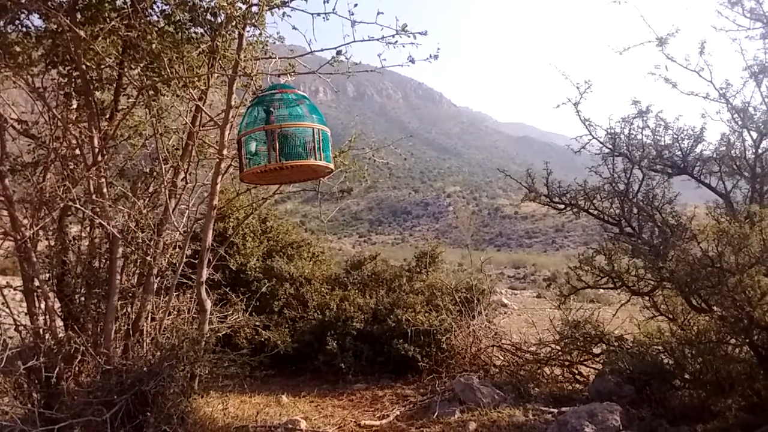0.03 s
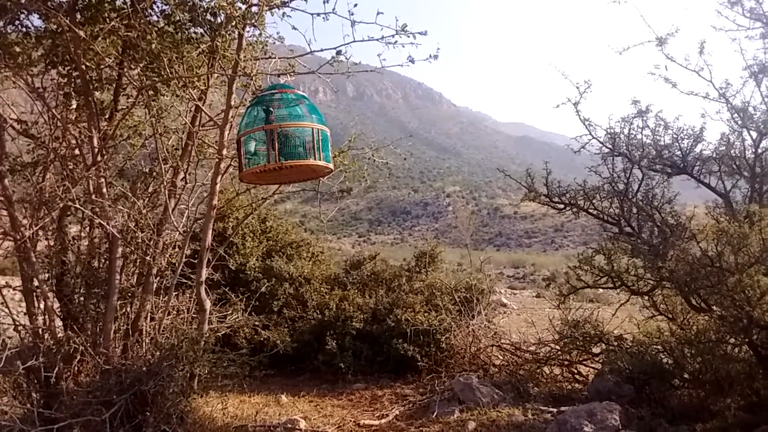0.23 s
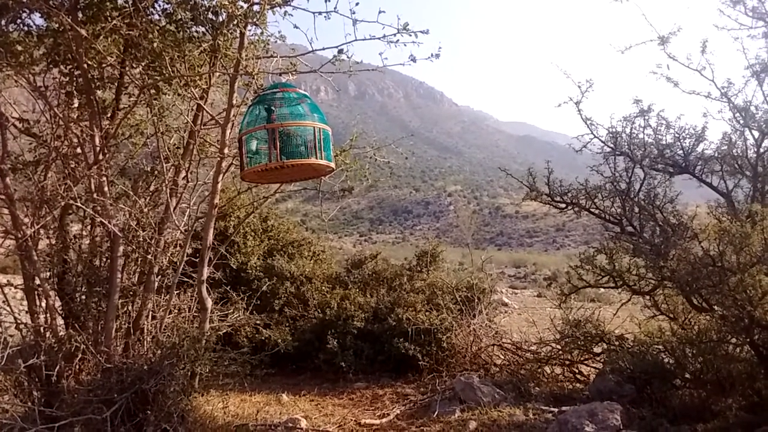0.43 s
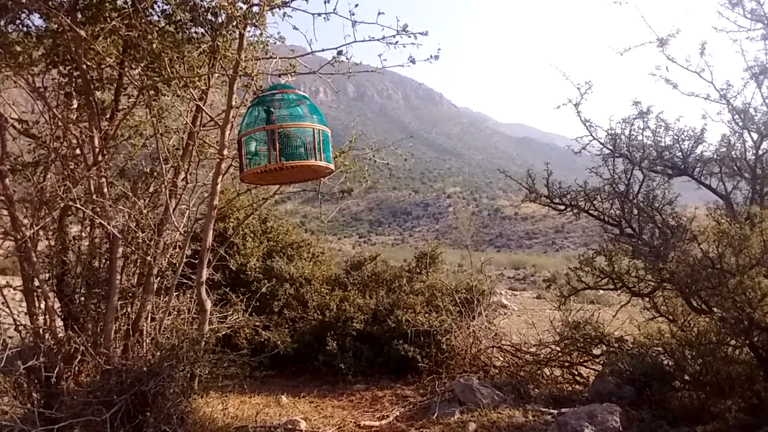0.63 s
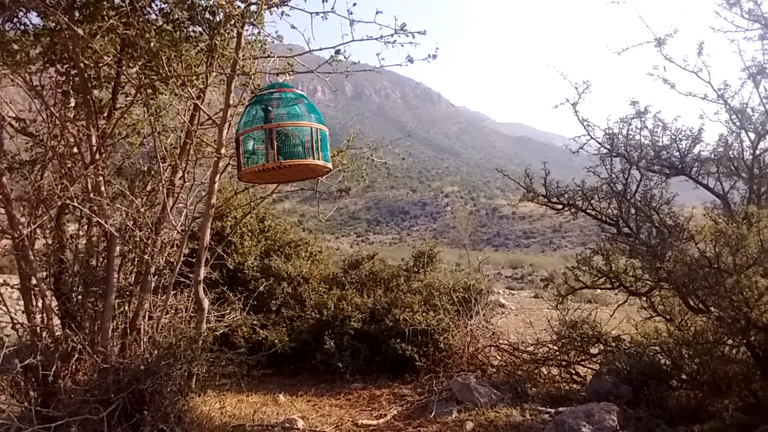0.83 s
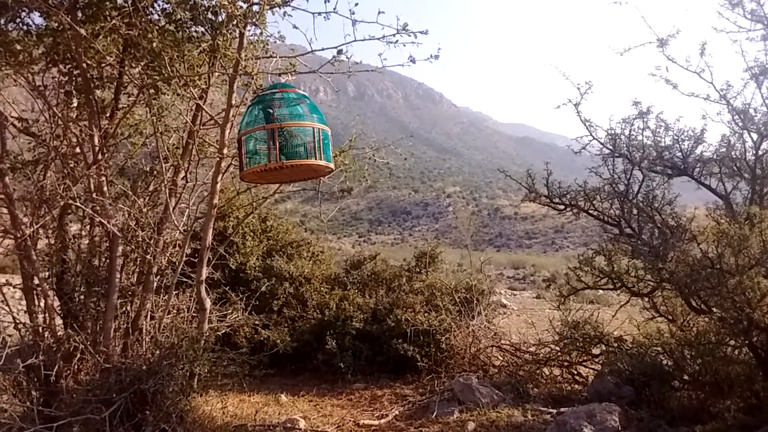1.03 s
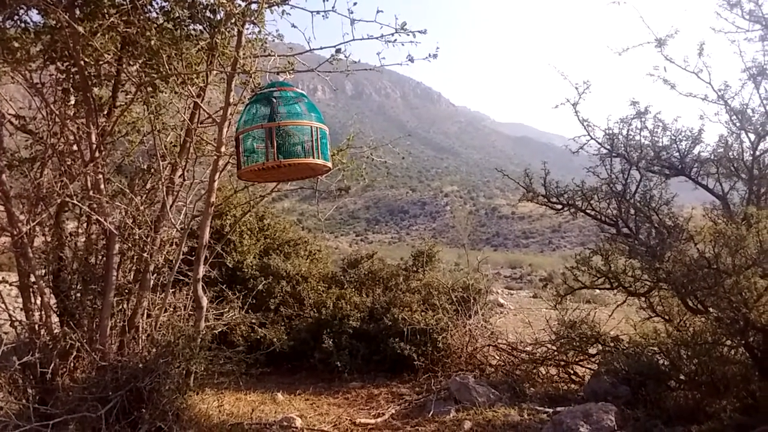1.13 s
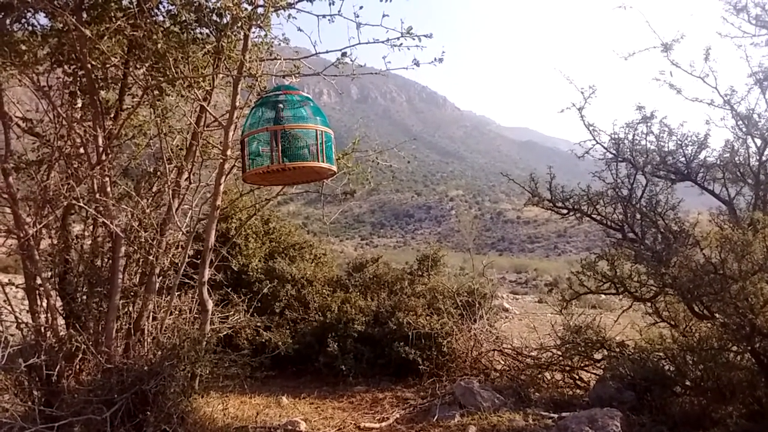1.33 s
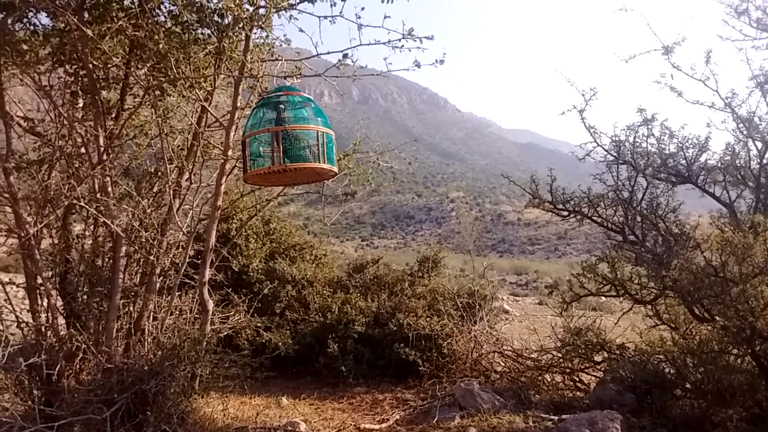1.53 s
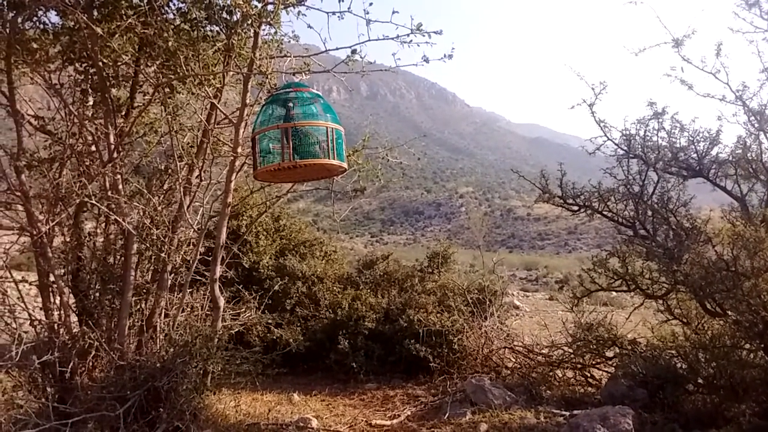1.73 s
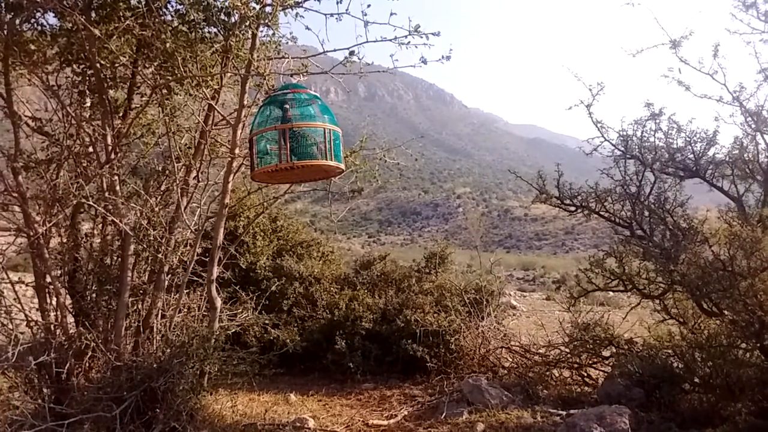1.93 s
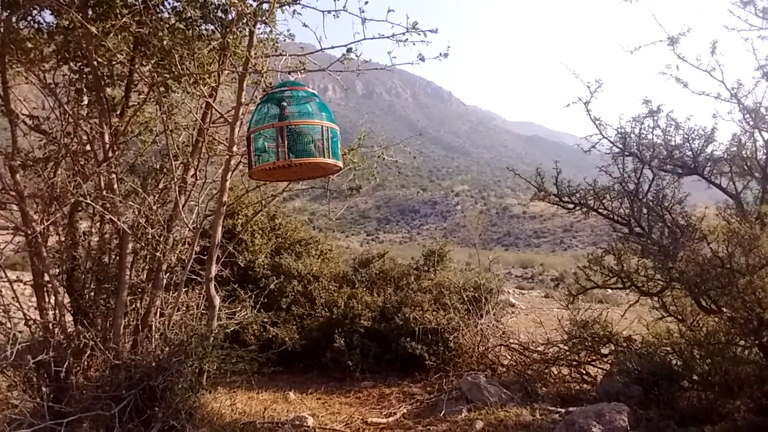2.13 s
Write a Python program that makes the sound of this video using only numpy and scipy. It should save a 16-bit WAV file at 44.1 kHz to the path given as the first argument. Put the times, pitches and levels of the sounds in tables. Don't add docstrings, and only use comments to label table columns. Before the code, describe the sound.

One quick francolin call, chip, whistle and falling yap, then a foot scuffs on gravel

```python
import sys
import numpy as np
from scipy import signal
from scipy.fft import rfft, irfft, next_fast_len
from scipy.io import wavfile
from scipy.ndimage import uniform_filter1d

SR = 44100
rng = np.random.default_rng(int(sys.argv[2]) if len(sys.argv) > 2 else 0)


def to_wav(s):
    ch = np.atleast_2d(s).T
    pcm = np.round(np.clip(ch, -1, 1) * 32767)
    wavfile.write(sys.argv[1], SR, pcm.astype(np.int16))


def voltage_ratio(level):
    return 10 ** (np.asarray(level, float) / 20)


N = 96711

# (frequency [Hz], density [dB per Hz])
BEAK_COLOUR = [(1500, -4), (3000, -3), (5600, 8), (7300, -7), (9300, -1), (10800, -8), (12300, -13),
               (15500, -14)]


def shaped(x, gain):
    size = next_fast_len(N + 4096)
    hz = np.arange(size // 2 + 1) * SR / size + 1e-3
    return irfft(rfft(x, size) * gain(hz), size)[..., :N]


def late(x, lag_s):
    return shaped(x, lambda f: np.exp(-2j * np.pi * f * lag_s))


def noise(colour, channels=1):
    hz, db = np.array(colour).T

    def gain(f):
        return voltage_ratio(np.interp(np.log(f), np.log(hz), db)) * np.minimum(f / hz[0], 1) ** 2

    x = shaped(rng.standard_normal((channels, N)), gain)
    return x / x.std()


def walk(rate_hz):
    k = max(int(SR / rate_hz), 2)
    x = uniform_filter1d(uniform_filter1d(rng.standard_normal(N), k), k)
    return x / x.std()


def air():
    # (frequency [Hz], density [dB per Hz])
    air_colour = [(28, -14), (60, -2.5), (130, 0), (300, -11), (900, -16.5), (2500, -19.5), (6200, -29),
                  (15000, -29)]
    air_db, shared_db, shared_hz = -54.5, 2, 294
    swell_s, swell_db = 1.39, 2
    motor_hz, motor_db = 325, -61.5
    t = np.arange(N) / SR
    shared = shaped(noise(air_colour), lambda f: voltage_ratio(shared_db) / (1 + 1j * f / shared_hz))
    swell = swell_db / (1 + np.exp(-(t - swell_s) / 0.018)) + 0.13 * walk(3.5)
    breeze = voltage_ratio(air_db + swell) * (noise(air_colour, channels=2) + shared)
    motor_phase = 2 * np.pi * np.cumsum(motor_hz * (1 + 0.00796 * walk(12.6))) / SR
    motor = np.sin(motor_phase) * voltage_ratio(motor_db + 1.35 * walk(16))
    return breeze + motor * np.array([[1], [.6]])


def far_birds():
    # (time [s], pitch [Hz], length [s], level [dB])
    blips = [
        (0.266, 1000, 0.0039, -49.5),
        (0.584, 1250, 0.0037, -53),
        (0.607, 2800, 0.0033, -51),
    ]
    t = np.arange(N) / SR
    return sum(voltage_ratio(db) * np.exp(-((t - s) / w) ** 2) * np.sin(2 * np.pi * hz * t)
               for s, hz, w, db in blips)


def note(curve, orders, jitter, shimmer_db, rasp_db, hiss_db, muffle_db=0):
    # (centre [Hz], width [Hz], boost [dB])
    throat = [(1917, 120, 5.5), (2710, 350, 5), (9680, 500, 20)]
    beak_opens_s = 0.0084
    t = np.arange(N) / SR
    s, hz, db = np.array(curve).T
    pitch = np.interp(t, s, hz) * (1 + jitter * walk(400))
    phase = 2 * np.pi * np.cumsum(pitch) / SR
    shut_db = muffle_db * np.exp(-(np.maximum(t - s[0], 0) / beak_opens_s) ** 2)
    tone = 0
    for k, order_db in orders:
        throat_db = sum(lift * np.exp(-((k * pitch - mid) / width) ** 2) for mid, width, lift in throat)
        level_db = order_db + throat_db - shut_db * max(k - 2, 0) + shimmer_db * walk(132)
        tone = tone + voltage_ratio(level_db) * np.cos(k * phase)
    gate = (t > s[0]) & (t < s[-1])
    envelope = uniform_filter1d(voltage_ratio(np.interp(t, s, db)) * gate, size=20)
    rasp = 1 + voltage_ratio(rasp_db) * walk(3500)
    return envelope * (np.sqrt(2) * tone * rasp + voltage_ratio(hiss_db) * noise(BEAK_COLOUR)[0])


def francolin():
    # (time [s], pitch [Hz], level [dB])
    chip = [(1.0775, 3530, -74), (1.0805, 3170, -40), (1.0822, 2505, -32), (1.084, 1643, -21),
            (1.0865, 1405, -27.5), (1.089, 1450, -40), (1.092, 1420, -76)]
    scoop = [(1.0915, 1300, -48), (1.0947, 1500, -30), (1.0965, 1850, -36), (1.0985, 2050, -44),
             (1.103, 1950, -50), (1.108, 1750, -60)]
    whistle = [(1.0966, 2300, -40), (1.098, 4000, -29), (1.0998, 4850, -28), (1.1035, 5250, -21),
               (1.1058, 5450, -24), (1.1072, 5550, -19.5), (1.111, 5550, -23), (1.1148, 5350, -30),
               (1.117, 5350, -48)]
    cluck = [(1.1262, 1900, -58), (1.1285, 1750, -45), (1.131, 1800, -47), (1.134, 1450, -48),
             (1.140, 1250, -58)]
    yap = [(1.159, 903, -102), (1.164, 939, -46), (1.168, 963, -25), (1.1705, 1001, -32),
           (1.174, 961, -27.5), (1.180, 932.4, -26), (1.188, 859.5, -30), (1.195, 794, -40),
           (1.1995, 790, -56)]
    # (multiple, level [dB])
    chip_orders = [(1, 0.5), (2, -25), (3, -33), (4, -45)]
    whistle_orders = [(1, 0), (2, -21)]
    yap_orders = [(1, -4.5), (2, -2.5), (3, -3), (4, -6.5), (5, -11.5), (6, -19.5), (7, -25), (8, -32),
                  (9, -30), (10, -46), (11, -60), (12, -58)]
    snap_s, snap_db, snap_rise_s, snap_decay_s = 1.0805, -36.5, 0.00057, 0.0079
    u = np.maximum(np.arange(N) / SR - snap_s, 0)
    snap_envelope = (1 - np.exp(-u / snap_rise_s)) * np.exp(-u / snap_decay_s)
    call = voltage_ratio(snap_db) * snap_envelope * noise(BEAK_COLOUR)[0]
    call += note(chip, chip_orders, jitter=.02, shimmer_db=1.2, rasp_db=-19, hiss_db=-26)
    call += note(scoop, chip_orders, jitter=.03, shimmer_db=2.2, rasp_db=-14, hiss_db=-13)
    call += note(whistle, whistle_orders, jitter=.006, shimmer_db=1.2, rasp_db=-21, hiss_db=-20)
    call += note(cluck, chip_orders, jitter=.08, shimmer_db=3, rasp_db=-5, hiss_db=-14)
    call += note(yap, yap_orders, jitter=0.0089, shimmer_db=1.7, rasp_db=-23.5, hiss_db=-18.5, muffle_db=6)
    call_low_hz = 740
    return signal.sosfiltfilt(signal.butter(3, call_low_hz, "high", fs=SR, output="sos"), call)


def far_port(bird):
    # (frequency [Hz], level [dB], lag [s])
    shadow = [(900, 0, 1.1e-4), (1900, 1.5, 6.5e-5), (2800, 2.6, 6e-5), (3700, 0, 6.3e-5),
              (5100, 7, 8.2e-5), (5600, 4.5, 8.8e-5), (9500, 0, 8.8e-5), (12000, -2, 8.8e-5)]
    hz, db, lag_s = np.array(shadow).T

    def gain(f):
        f_db, f_lag_s = (np.interp(np.log(f), np.log(hz), v) for v in (db, lag_s))
        return voltage_ratio(f_db) * np.exp(-2j * np.pi * f * f_lag_s)

    return shaped(bird, gain)


def scrub(bird):
    t60_s, scrub_db, first_echo_s = .13, -23, .003
    u = np.arange(int(.4 * SR)) / SR
    scatter = rng.standard_normal((2, len(u))) * np.exp(-np.log(1000) * u / t60_s) * (u > first_echo_s)
    scatter /= np.sqrt(np.sum(scatter[0] ** 2))
    return voltage_ratio(scrub_db) * signal.fftconvolve(bird[None], scatter, axes=1)[:, :N]


def scuff():
    # (frequency [Hz], density [dB per Hz])
    gravel = [(900, -4), (2400, -4.5), (3100, -8.5), (4100, 1), (5800, -6), (8400, 5.5), (9800, -5.5),
              (15000, -19)]
    scuff_s, scuff_db, attack_s, decay_s = 1.6258, -52, .0015, 0.043
    thud_hz, thud_db, thud_rise_s = 115, -22, .0042
    u = np.maximum(np.arange(N) / SR - scuff_s, 0)
    grit = noise(gravel, channels=2) * voltage_ratio(2.0 * walk(400))
    grit = grit[0] + voltage_ratio(1.5) * grit
    drag = (1 - np.exp(-u / attack_s)) * np.exp(-(u / decay_s) ** 1.7)
    thud = voltage_ratio(thud_db) * np.sin(2 * np.pi * thud_hz * u) * u / thud_rise_s * np.exp(-u / thud_rise_s)
    return voltage_ratio(scuff_db) * drag * grit + thud * np.array([[-1], [0]])


def scene():
    foot_lag_s, foot_right_db, air_right_db = 6e-5, 5.5, 1.4
    background = air() * voltage_ratio([[0], [air_right_db]]) + far_birds() * np.array([[1], [.3]])
    bird = francolin()
    call = np.array([bird, far_port(bird)]) + scrub(bird)
    foot = scuff()
    foot = np.array([foot[0], voltage_ratio(foot_right_db) * late(foot[1], foot_lag_s)])
    return background + call + foot


def low_pass(x):
    return signal.sosfilt(signal.butter(12, 15700, fs=SR, output="sos"), x)


def record(dry):
    port_lag_s, cross_left, cross_right, cross_top_hz = 3.17e-4, .57, .47, 8400
    flip, flip_hz, flip_width_hz = .8, 14100, 800
    top_hz = 15680

    def cross_gain(f):
        dulled = 1 / np.sqrt(1 + (f / cross_top_hz) ** 6)
        return dulled - flip * np.exp(-((f - flip_hz) / flip_width_hz) ** 2)

    other = shaped(late(dry[::-1], port_lag_s), cross_gain)
    wide = dry - other * np.array([[cross_left], [cross_right]])
    wide = signal.sosfilt(signal.ellip(10, .2, 70, top_hz, fs=SR, output="sos"), wide)
    return low_pass(wide)


dry = scene()
out = record(dry)
to_wav(out)
```